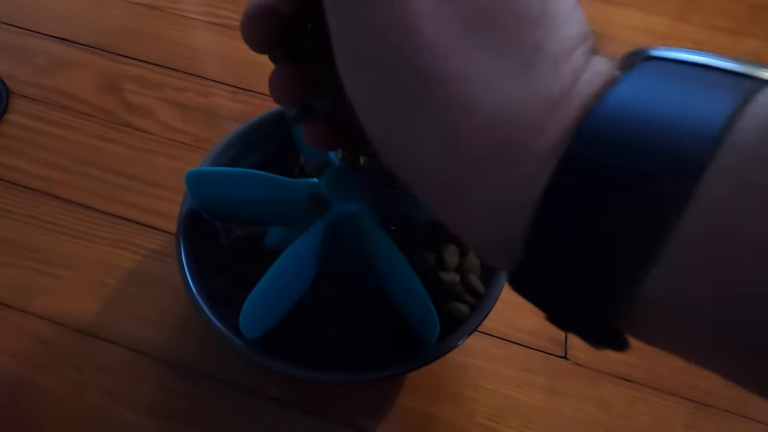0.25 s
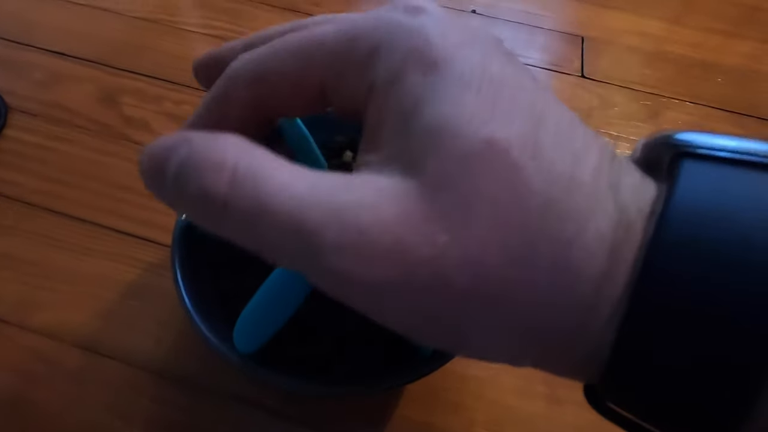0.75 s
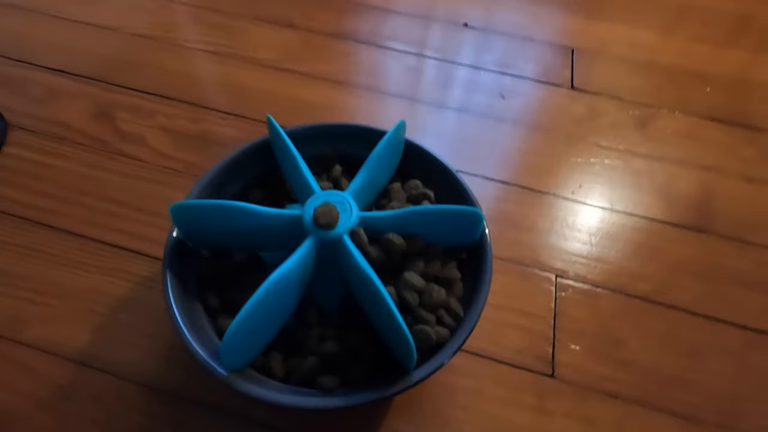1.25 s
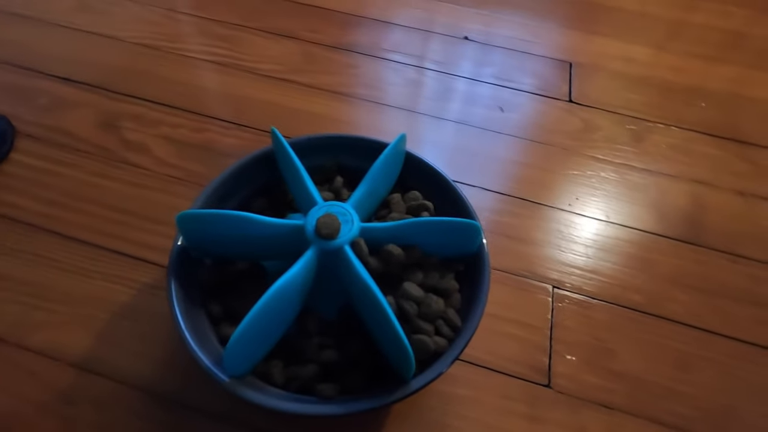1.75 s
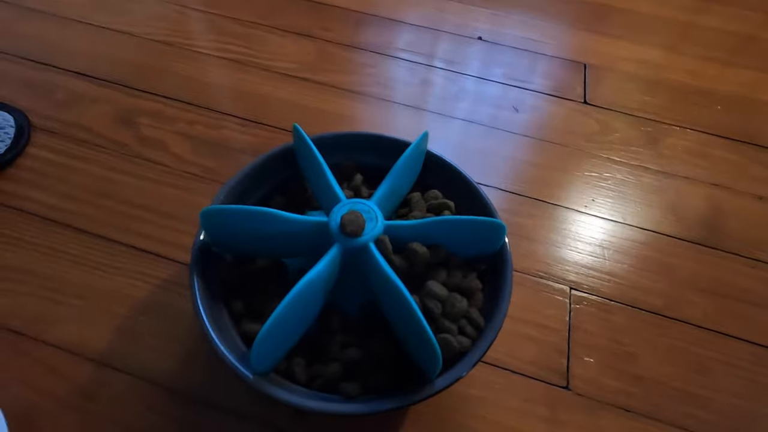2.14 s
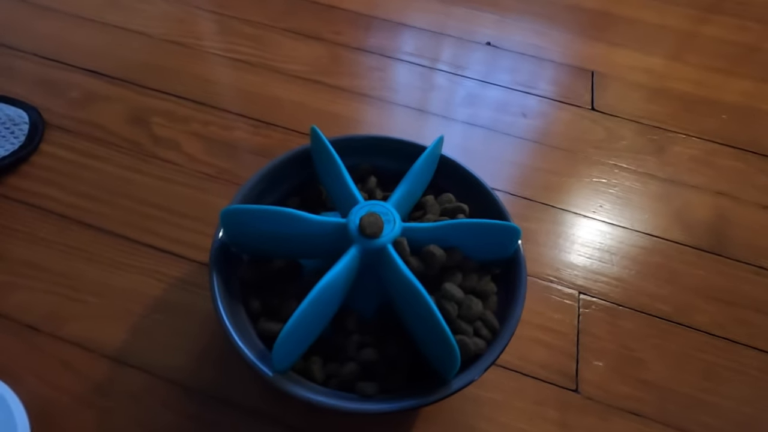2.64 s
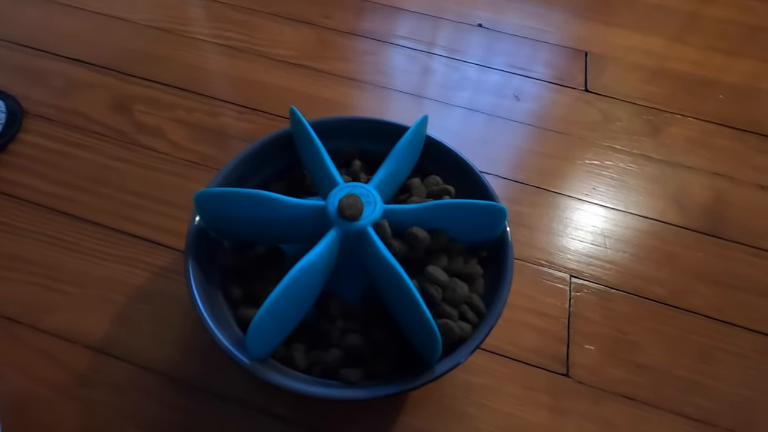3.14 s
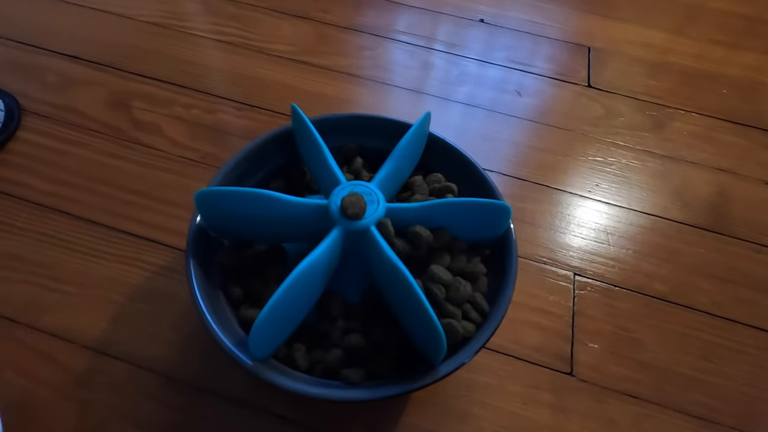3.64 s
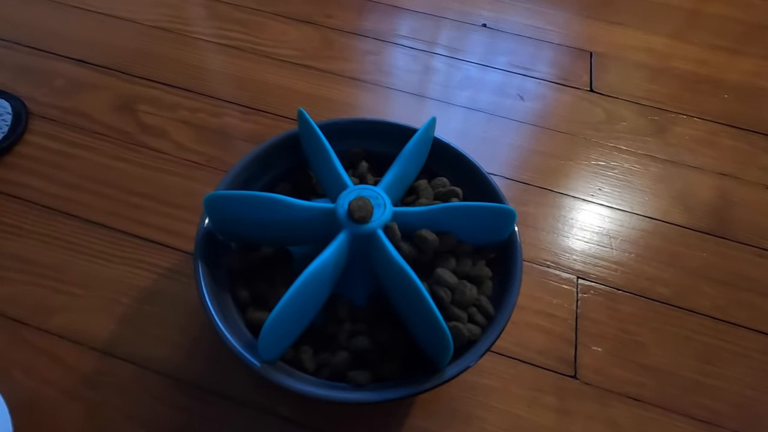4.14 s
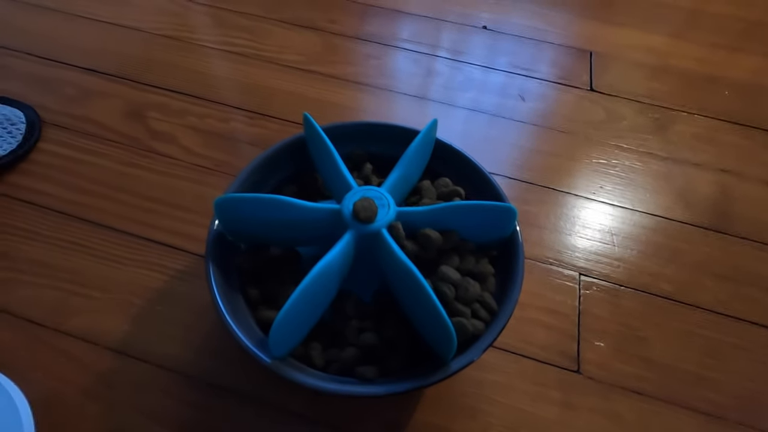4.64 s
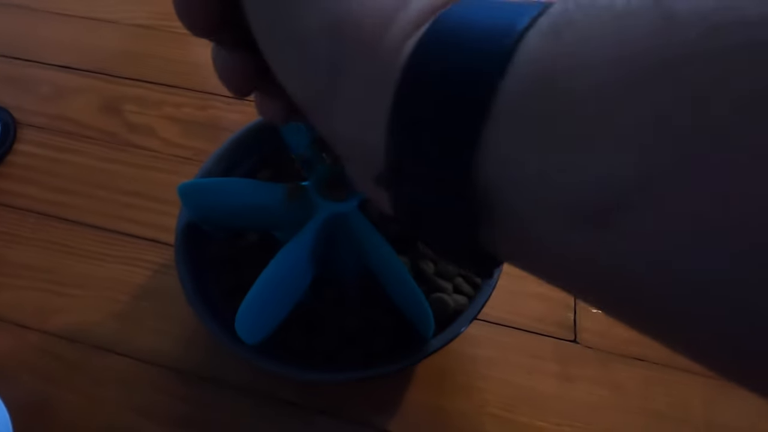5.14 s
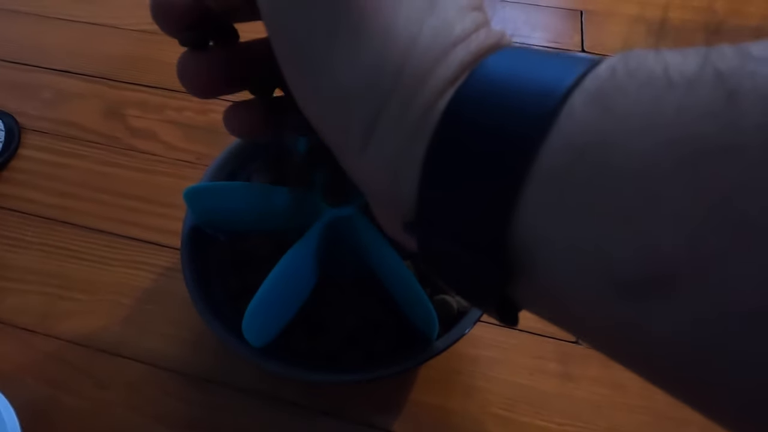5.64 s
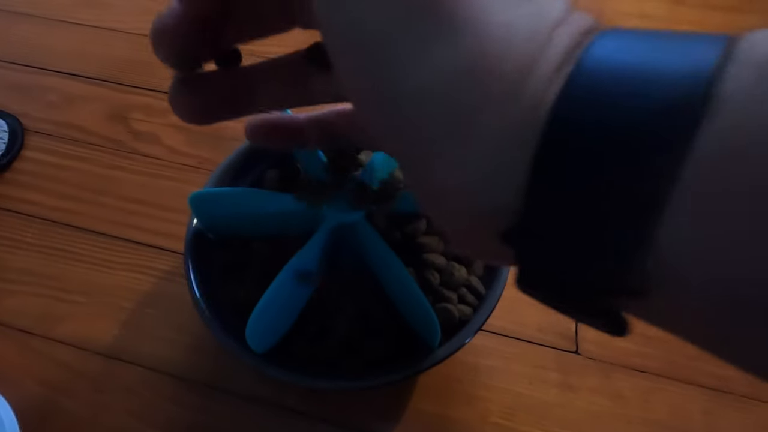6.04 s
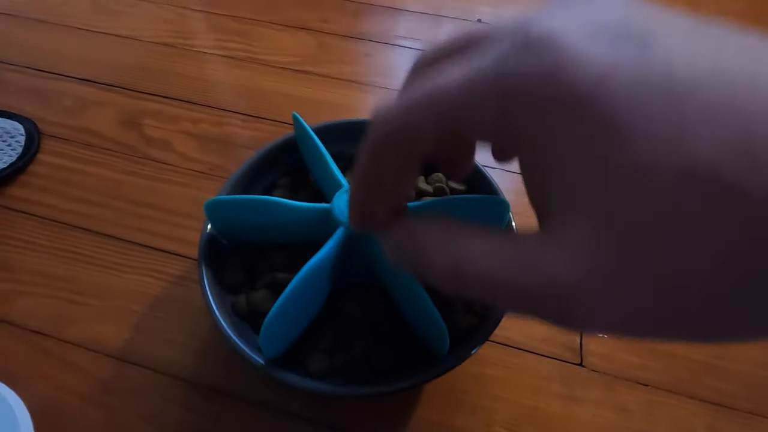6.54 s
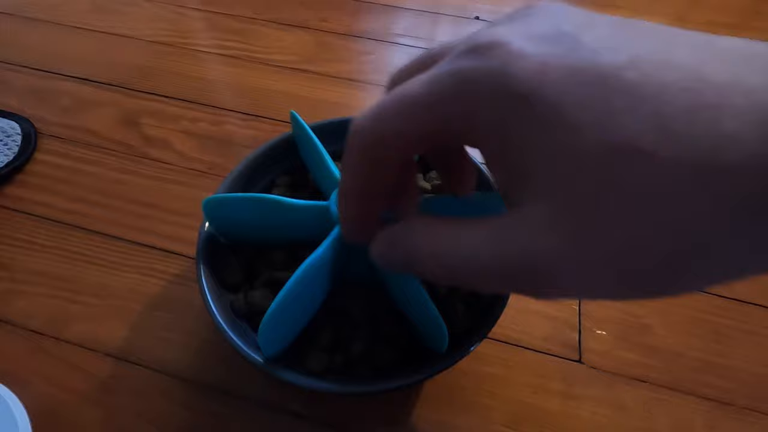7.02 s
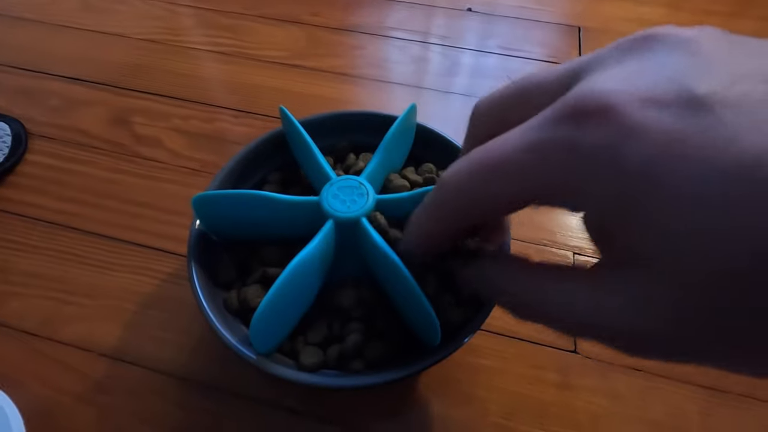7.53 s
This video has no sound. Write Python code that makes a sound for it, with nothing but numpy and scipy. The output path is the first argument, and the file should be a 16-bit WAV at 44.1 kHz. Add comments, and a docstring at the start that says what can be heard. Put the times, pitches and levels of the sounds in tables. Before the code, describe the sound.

Hard kibble patters and clinks into a bowl, pauses while a sleeve rustles, pours again, then fingers nudge a few last pieces indoors.

```python
"""Dry kibble poured into a glazed bowl

Two handfuls of kibble trickle from a hand into a glazed bowl with a plastic vaned insert, on a wooden floor.
Bowl, insert and pieces ring as banks of decaying modes; faint contacts are random trains of short grains.
Between handfuls cloth rustles as shaped noise and the hand-held microphone is bumped; at the end fingers
nudge a few strays in. Filtered noise and narrow wavering tones form a quiet room underneath."""
import sys
import numpy as np
from scipy import signal
from scipy.fft import rfft, irfft
from scipy.io import wavfile

SR = 44100
rng = np.random.default_rng(int(sys.argv[2]) if len(sys.argv) > 2 else 0)


def unload_wav(signal):
    """Save mono or channel-first audio to the path in sys.argv[1] as 16-bit WAV at rate SR, clipped to [-1, 1]."""
    wavfile.write(
        sys.argv[1],
        SR,
        np.round(np.clip(np.atleast_2d(signal).T, -1, 1) * 32767).astype(np.int16),
    )


N = 343098

# Pieces striking the bowl; hardness tilts the spectrum, the spot struck sets the two strongest mode groups
# [start_s, level_db, hardness_db_per_octave, modes_near_2500_hz_db, modes_near_4000_hz_db]
CLINKS = [(0.2095, -23.5, -9, -5.5, -9.5), (0.2225, -29, -8, 2.5, -3), (0.234, -19, 5, 5.5, 1),
          (0.2393, -26.5, 3, 2.5, 1), (0.2546, -25, -5.5, 2.5, 5.5), (0.2948, -18, -6.5, -0.5, -3),
          (0.3852, -27, -8.5, 3, 3.5), (0.397, -29.5, -6, 0, -12), (0.451, -37, -23, -5, 4.5),
          (0.4797, -32.5, -8, 3, -0.5), (0.512, -26, -2.5, -8.5, -16), (0.5313, -28.5, 3.5, 7.5, -12),
          (0.553, -28.5, -17.5, -2, -26), (0.562, -32.5, -14, 2, 1), (0.693, -28.5, -4, -1, -7),
          (0.7499, -23, -11, -1, -2), (0.8, -32, 6.5, 8, -1.5), (0.8258, -37.5, -13, -0.5, -3),
          (0.9248, -53, -6, 13, -6.5), (1.006, -45, -10, -4, -6), (1.059, -61.5, -13, 4, 1.5),
          (5.7919, -19, -10, 1.5, -3), (5.839, -36.5, -1.5, -2.5, -0.5), (5.858, -30.5, -9, 4.5, -5),
          (5.897, -45, 1, -0.5, -4), (5.908, -26.5, -7, -1, -6.5), (5.9481, -24.5, -1, 6, -5),
          (5.973, -42, -7, -0.5, -8), (6.001, -40.5, -3, -15, 1.5), (6.19, -33, -10, -5, -7.5),
          (6.2596, -28.5, -11, -7, -12), (6.3166, -41, -6.5, 3, -1.5), (6.3611, -17.5, 4, 0, -2.5),
          (6.379, -40.5, -7.5, 5, -4.5), (6.533, -48, -16, 7.5, -4.5), (6.582, -69.5, -3, 7, -3.5),
          (6.9548, -38, -9.5, -5.5, -5), (6.968, -58.5, -16, 1, -3), (7.007, -64.5, -6.5, 4, 0),
          (7.59, -48, -3, -7, -18), (7.625, -30, 0.5, -13, -7), (7.6955, -40, 7.5, -7, -4)]


def undb(db):
    """Amplitude gain is the exponential of a level: 20 dB is a factor of ten."""
    return 10 ** (np.asarray(db) / 20)


def unit(x):
    """Normalization by the root mean square gives a signal unit effective value."""
    return x / np.sqrt(np.mean(x ** 2))


def colour(x, points):
    """Minimum-phase filtering: folding the cepstrum of a (Hz, dB) spectrum gives a causal response."""
    hz, db = np.transpose(points)
    size = 8192
    f = np.maximum(np.fft.rfftfreq(size, 1 / SR), 1)
    log_magnitude = np.log(undb(np.interp(np.log(f), np.log(hz), db)))
    cepstrum = irfft(log_magnitude)[:size // 2]
    cepstrum[1:] *= 2
    response = irfft(np.exp(rfft(cepstrum, size)))[:size // 2]
    if x.ndim > 1:
        response = response[None]
    return signal.oaconvolve(x, response, axes=-1)[..., :N]


def walk(rate):
    """Slow fluctuation: random knots, `rate` per second, joined by lines with a spread near 1."""
    knots = rng.standard_normal(4096)
    return 1.2 * np.interp(np.arange(N) / SR * rate, np.arange(len(knots)), knots)


def add(track, s, sound):
    """Superposition: a sound adds linearly to a track from time s."""
    i = int(np.clip(s * SR, 0, N))
    track[..., i:i + sound.shape[-1]] += sound[..., :N - i]


def swell(s, rise, hold, fall, shape):
    """Envelope: full from s through hold, 20 dB down `rise` seconds before and `fall` seconds after."""
    t = np.arange(N) / SR - s
    away = np.clip(np.maximum(-t / rise, (t - hold) / fall), 0, 10)
    return undb(-20 * np.minimum(away ** shape, 10))


def ring(hz, gain, t60, length, rise=0.00016):
    """Modal synthesis: random-phase sines decay 60 dB in t60; the onset has time constant `rise`."""
    t = np.arange(int(length * SR)) / SR
    phase = rng.uniform(0, 2 * np.pi, (len(hz), 1))
    decay = np.exp(-np.log(1000) * np.outer(1 / t60, t))
    waves = np.sin(2 * np.pi * np.outer(hz, t) + phase) * decay
    return gain @ waves * (1 - np.exp(-t / rise))


def grain(hz, cycles, spread, count=7):
    """Strong damping: a small hard piece is a mode cluster around hz, dead in a few cycles; unit energy."""
    places = np.linspace(-1, 1, count) + .2 * rng.standard_normal(count)
    modes = np.minimum(hz * np.exp(spread * places), .42 * SR)
    weight = np.exp(-(np.log(modes / hz) / spread) ** 2)
    sound = ring(modes, weight, cycles / np.sqrt(modes * hz), length=.012, rise=.5 / hz)
    return sound / np.linalg.norm(sound)


def strikes(rows, cycles, spread):
    """Double impact: each (s, dB, Hz) row lands as a grain and soon rocks onto a second edge."""
    rock_s, rock_db = .0018, -5  # typical delay before random scaling; second edge relative to first
    out = np.zeros(N)
    for s, db, hz in rows:
        damping, shape, lag, edge = rng.uniform(.65, 1.35, 4)
        gain = undb(db) / np.hypot(1, undb(rock_db))
        add(out, s, gain * grain(hz, cycles * damping, spread * shape))
        second = grain(hz * edge, cycles * damping, spread)
        add(out, s + rock_s * lag ** 2, gain * undb(rock_db) * second)
    return out


def shower(rate, hz, cycles, scatter_db, count=12):
    """Shot noise: random contacts of `count` piece sizes, most faint and a few strong; rms 1."""
    times, sizes, pieces = rng.random((12000, 3))[:int(rate * N / SR)].T
    out = np.zeros(N)
    for k in range(count):
        own = (pieces * count).astype(int) == k
        pulses = np.zeros(N)
        pulses[(times[own] * N).astype(int)] = undb(-scatter_db * np.log(sizes[own] + 0.064))
        piece = grain(hz * np.exp(1.4 * (k / count - .5)), cycles, 0.89)
        out += signal.oaconvolve(pulses, piece)[:N]
    return unit(out)


def skids(rows, cycles, spread):
    """Stick-slip: a nearly even train of slips swells and fades, each slip ringing the same grain."""
    out = np.zeros(N)
    for s, length, db, hz, rate in rows:
        slip = grain(hz, cycles, spread)
        jitter = rng.standard_normal((40, 2))
        places = np.arange(.5, max(length * rate, 1))[:len(jitter)]
        arch = np.sqrt(np.sin(np.pi * places / (places[-1] + .5)))
        sizes = arch * undb(2 * jitter[:len(places), 0])
        sizes = sizes / np.linalg.norm(sizes)
        for place, size, late in zip(places, sizes, jitter[:, 1]):
            add(out, s + (place + .12 * late) / rate, undb(db) * size * slip)
    return out


def background():
    """Partly correlated noise fields: hiss with bass alike on both sides, over narrowband wavering tones."""
    # Spectrum of the quiet room before normalization [frequency_hz, relative_db]
    air_points = [(25, -4.5), (49, -10), (85, -10.5), (160, -5.5), (250, -16.5), (380, -23), (620, -38.5),
                  (950, -36), (2000, -43), (3300, -49.5), (5200, -62), (7300, -52.5), (9500, -67),
                  (16000, -77)]
    # Drone and whine of a distant appliance [frequency_hz, relative_db]
    hum_tones = [(96, -62.5), (144, -56.5), (350, -76), (894, -87), (1060, -85.5), (1950, -91)]
    air_db = -52.5
    mid, side = colour(rng.standard_normal((2, N)), air_points)
    side = colour(side, [(100, -23.0), (300, -12.0), (1000, -2.5), (5000, -4.0)])
    wavering = undb(.8 * walk(3))
    air = undb(air_db) * unit(mid + np.outer([1, -1], side)) * wavering
    t = np.arange(N) / SR
    drone = np.zeros(N)
    for hz, db in hum_tones:
        modulation = walk(28) + 1j * walk(28)  # random amplitude and phase broaden each tone
        drone += undb(db) * np.real(modulation * np.exp(2j * np.pi * hz * t))
    return (air + drone) * undb(np.array([[-.5], [.5]]))


def bumps():
    """Contact stiffness: soft blows on the microphone excite few high modes, and those decay first."""
    # Dull bumps of the hand holding the microphone; decay is that of a 350 Hz mode
    # [start_s, level_db, lowest_hz, brightness_hz, t60_at_350_hz_s]
    bump_rows = [(0.053, -32, 149.8, 330, 0.069), (0.13, -13.5, 186, 500, 0.041),
                 (0.163, -26, 218.3, 297, 0.22), (3.303, -22, 150, 254, 0.035),
                 (3.321, -16.5, 170, 230, 0.049), (3.4574, -18.5, 327, 1230, 0.055),
                 (3.7083, -23, 300, 610, 0.048), (5.0655, -21.5, 220, 1044, 0.069),
                 (5.082, -21.5, 198, 386, 0.062), (5.1071, -18.5, 217, 890, 0.037),
                 (5.151, -27, 150, 220, 0.081)]
    # Modes of the microphone casing [frequency_hz, relative_db]
    casing_modes = [(150, -16.5), (220, -13), (275, -4.5), (345, -3), (425, -5), (555, -10), (690, -9),
                    (820, -12.5), (920, -10), (1090, -8.5), (1240, -6.5), (1480, -14)]
    scuff_db, scuff_t60_s = -17.5, 0.1  # skin drags briefly on the casing; level relative to the bump
    sway_s, sway_db = 0.12, -40  # the microphone sways as the hand first opens
    hz, db = np.transpose(casing_modes)
    out, t = np.zeros(N), np.arange(SR // 4) / SR
    for s, level_db, low_hz, bright_hz, t60 in bump_rows:
        gain = undb(db + level_db) / np.hypot(1, (hz / bright_hz) ** 3)
        gain = gain / np.hypot(1, (low_hz / hz) ** 4)
        add(out, s, ring(hz, gain, t60 * (350 / hz) ** .55, length=.2, rise=.0015))
        band = signal.butter(2, [low_hz, low_hz + bright_hz / 2], "bandpass", fs=SR, output="sos")
        scuff = unit(signal.sosfilt(band, rng.standard_normal(len(t))))
        add(out, s, scuff * undb(level_db + scuff_db - 60 * t / scuff_t60_s))
    out = colour(out, [(1500, 0), (2500, -9), (5000, -24)])
    rumble = colour(rng.standard_normal(N), [(15, -9.0), (28, 8.5), (50, -3.5), (100, -24.0),
                                             (300, -11.0), (450, -21.0), (1000, -55.0)])
    return out + unit(rumble) * undb(sway_db) * swell(sway_s, rise=.25, hold=.04, fall=.16, shape=1)


def room(x, wet_db, t60_s, early_db):
    """Reverberation: floor and hand reflect early, walls add a short tail whose treble decays sooner."""
    t = np.arange(SR // 2) / SR
    early = rng.standard_normal((3, len(t))) * undb(-60 * t / 0.051) * (t > .002)
    noise = rng.standard_normal((3, len(t)))
    low = signal.sosfilt(signal.butter(2, 1800, fs=SR, output="sos"), noise)
    tail = low * undb(-60 * t / t60_s) + (noise - low) * undb(-60 * t / (.65 * t60_s))
    tail = tail * (t > .008)
    early = undb(early_db) * early / np.linalg.norm(early[0])
    tail = undb(wet_db) * tail / np.linalg.norm(tail[0])
    both, left, right = early + tail
    response = 1.6 * both + 2.2 * np.array([left, right])  # shared part correlates the two sides
    wet = signal.oaconvolve(x[None], response, axes=1)[:, :N]
    return colour(wet, [(200, -0.5), (600, 1.5), (2500, 1.5), (7000, -0.5), (12000, 4.5)])


def shakes(rows):
    """Modal participation: each landing meets another spot and excites its own mix of modes below it."""
    # Modes of the insert, and of the bowl pressed through it [frequency_hz, relative_db, t60_s]
    shaken_modes = [(540, -13, 0.014), (660, -13, .014), (1120, -3.5, .014), (1270, -0.5, 0.015),
                    (1600, 0, 0.01), (2574, -8, .026), (2772, -12.5, .02), (3984, -11.5, 0.052)]
    shake_db, scatter_db = -15, 5  # level relative to the landing; spread from spot to spot
    hz, db, t60 = np.transpose(shaken_modes)
    out = np.zeros(N)
    for s, level_db, _ in rows:
        spot, load = rng.standard_normal((2, len(hz)))
        detune = 1 + load * np.where(hz < 2000, .085, .005)
        sound = ring(hz * detune, undb(db + scatter_db * spot), t60, length=.04, rise=.0003)
        add(out, s, undb(level_db + shake_db) * sound / np.linalg.norm(sound))
    return out


def kibble():
    """Impact and friction: pieces tick, skid and knock on the insert, and each listed landing shakes it."""
    # The hand opens, lets pieces run and empties [full_flow_s, rise_s, hold_s, fall_s, flow_db]
    pour_rows = [(0.268, 0.35, 0.2, 0.4, 2), (5.779, 0.69, 0.085, 0.65, -5.5)]
    # Sharpest landings on other pieces, before spectral shaping [start_s, level_db, pitch_hz]
    tick_rows = [(0.0449, -20.5, 6600), (0.0675, -22.5, 6200), (0.0806, -32, 5700), (0.0858, -19, 5700),
                 (0.1015, -50, 6500), (0.1149, -12.5, 5260), (0.1466, -12.5, 4700), (0.1748, -14.5, 3900),
                 (0.1909, -16, 6300), (0.2052, -18, 5500), (0.2105, -14, 6200), (0.2735, -21, 6500),
                 (0.2872, -14, 5640), (0.3107, -5, 5300), (0.3298, -21, 4100), (0.3605, -17, 5300),
                 (0.3744, -17, 4370), (0.396, -21, 7000), (0.4209, -18, 4800), (0.4253, -20, 5200),
                 (0.4402, -28, 4470), (0.5034, -14, 4200), (0.546, -15, 4630), (0.5923, -16, 6700),
                 (0.6107, -18, 6130), (0.6256, -17, 6350), (0.6351, -12.5, 7500), (0.6588, -17, 6200),
                 (0.6659, -17, 7100), (0.6861, -36, 4900), (0.6901, -10, 6400), (0.7012, -8, 7060),
                 (0.7211, -33, 5800), (0.7345, -25, 6400), (0.739, -15, 6350), (0.8491, -12.5, 5360),
                 (0.8619, -23, 7550), (0.9245, -18, 8550), (0.934, -39, 7000), (0.952, -41, 6800),
                 (0.9681, -27, 5770), (1.0329, -27.5, 7280), (1.081, -38.5, 6640), (5.2083, -24.5, 6380),
                 (5.2173, -27, 6000), (5.2401, -25, 6200), (5.2858, -21.5, 7100), (5.3043, -17.5, 6200),
                 (5.316, -36, 5370), (5.3211, -11.5, 6650), (5.3713, -17, 5400), (5.3813, -15, 6200),
                 (5.3942, -19, 5700), (5.4085, -29, 6400), (5.4238, -21.5, 7540), (5.4679, -24, 7600),
                 (5.4756, -22, 7200), (5.5111, -19, 6300), (5.5161, -13, 6600), (5.5366, -18, 6500),
                 (5.5648, -11.5, 6900), (5.5845, -10, 6050), (5.5958, -9.5, 7200), (5.6069, -14, 7000),
                 (5.6278, -18, 7100), (5.6826, -12.5, 7200), (5.6934, -12.5, 6000), (5.7417, -20, 5540),
                 (5.7457, -12, 7100), (5.7691, -7, 5300), (5.7751, -31, 5400), (5.822, -13, 3950),
                 (5.8392, -12.5, 4930), (5.8456, -14, 6100), (5.8583, -10.5, 4030), (5.8665, -8, 5840),
                 (5.878, -4, 6150), (5.8872, -21, 5800), (5.8963, -10, 5600), (5.912, -4.5, 6360),
                 (5.9743, -10.5, 6900), (5.9944, -13.5, 4720), (6.0077, -19, 5600), (6.0233, -15, 5400),
                 (6.0289, -24, 5800), (6.0416, -11, 5900), (6.0476, -24, 5400), (6.054, -12.5, 5940),
                 (6.0856, -10, 6660), (6.089, -25, 5300), (6.1248, -13.5, 7700), (6.1526, -16, 6800),
                 (6.1616, -32, 6200), (6.1714, -13, 4700), (6.205, -22, 4400), (6.215, -19.5, 5800),
                 (6.2779, -10.5, 6540), (6.308, -18, 5700), (6.3529, -21, 5160), (6.4311, -23, 5700),
                 (6.4937, -15, 6200), (6.497, -23, 5200), (6.886, -35.5, 4430), (6.9253, -23.5, 6260),
                 (6.939, -31, 6480), (7.215, -36, 6400), (7.5207, -22.5, 4000), (7.5487, -26.5, 5370),
                 (7.7157, -21.5, 6000), (7.7382, -19, 4600)]
    # Heaviest landings on the plastic insert, before spectral shaping [start_s, level_db, pitch_hz]
    knock_rows = [(0.0409, -13.5, 1566), (0.045, -16, 1498), (0.068, -21.5, 2200), (0.0851, -14.5, 1610),
                  (0.1005, -13.5, 1480), (0.118, -18.5, 2198), (0.141, -16, 1700), (0.149, -16, 1500),
                  (0.1657, -9.5, 1870), (0.176, -16.5, 1700), (0.27, -11.5, 1920), (0.306, -9, 1675),
                  (0.328, -21, 1973), (0.354, -17.5, 1500), (0.382, -26, 1280), (0.4077, -14, 1580),
                  (0.424, -11, 1570), (0.4461, -9.5, 1440), (0.5403, -17, 2120), (0.547, -17, 1340),
                  (0.6406, -11.5, 1680), (0.6716, -13, 2070), (0.7, -10.5, 1630), (0.7175, -5.5, 1590),
                  (0.7346, -14, 1610), (0.7595, -11, 1538), (0.84, -28, 1600), (0.857, -19, 1600),
                  (0.8613, -22.5, 1360), (0.905, -36, 1700), (0.9241, -16, 1360), (0.933, -27, 1350),
                  (0.951, -30, 1690), (0.9693, -21.5, 1600), (0.988, -25, 1600), (1.007, -20, 1580),
                  (1.042, -24.5, 1367), (5.2018, -14.5, 1530), (5.222, -17, 1470), (5.2402, -16, 1520),
                  (5.3151, -8.5, 1940), (5.328, -17, 1530), (5.3707, -17, 1960), (5.38, -7.5, 1770),
                  (5.3947, -17.5, 2040), (5.417, -19, 1610), (5.435, -16.5, 1570), (5.4867, -14.5, 1330),
                  (5.532, -16.5, 1820), (5.57, -28, 1496), (5.5847, -16, 2360), (5.596, -9, 1840),
                  (5.607, -21.5, 1600), (5.6273, -24, 1800), (5.6688, -8, 1410), (5.688, -7, 1392),
                  (5.6993, -15, 1518), (5.7253, -18.5, 1583), (5.7326, -7.5, 1270), (5.746, -23.5, 1600),
                  (5.7611, -10, 1680), (5.7682, -16, 2324), (5.8021, -10, 1500), (5.832, -5.5, 1580),
                  (5.8562, -19, 2500), (5.868, -25, 2180), (5.882, -6.5, 1600), (5.9778, -16.5, 1490),
                  (5.9902, -10, 1670), (6.0008, -9.5, 1930), (6.0236, -20.5, 1480), (6.0432, -15.5, 1390),
                  (6.0746, -20.5, 1390), (6.0953, -19.5, 1600), (6.1152, -15.5, 1517),
                  (6.1602, -13.5, 1475), (6.17, -24.5, 1680), (6.1956, -11.5, 1530), (6.2797, -12.5, 2240),
                  (6.3375, -12, 1695), (6.41, -17.5, 1290), (6.431, -19.5, 1750), (6.496, -28, 1540),
                  (6.5353, -34.5, 1740), (6.9555, -21, 1770)]
    # Pieces catching and slipping over neighbours [start_s, length_s, level_db, pitch_hz, slips_per_s]
    skid_rows = [(0.3625, 0.0094, -21, 5200, 900), (0.3795, .005, -13, 4300, 700),
                 (0.6845, 0.0098, -15, 3600, 1040), (0.739, 0.007, -17, 4000, 510),
                 (5.2385, 0.0051, -14, 2300, 700), (5.4745, 0.0056, -14.5, 4100, 880),
                 (5.553, 0.0033, -16, 5800, 650), (5.676, 0.015, -14, 5600, 600),
                 (5.7215, .007, -12.5, 4700, 800), (5.7725, 0.0081, -15, 5200, 750),
                 (5.889, .006, -16, 4900, 750)]
    crackle_db, patter_db = -46, -49  # small contacts among pieces and on the insert, at 0 dB flow
    patter_law = .75  # exponent under 1: a thin stream still reaches the insert
    clink_tick_db, tick_hz = 0, 6200  # a piece hitting the bowl also ticks itself
    cushion_db = -7  # a tick shakes the insert less than a knock

    flow = sum(undb(db) * swell(s, rise, hold, fall, shape=2.0) for s, rise, hold, fall, db in pour_rows)
    crackle = undb(crackle_db) * flow * shower(rate=260, hz=5600, cycles=13, scatter_db=6.3)
    patter = undb(patter_db) * flow ** patter_law * shower(rate=210, hz=1850, cycles=8, scatter_db=5.8)
    on_bowl = [(s, db + clink_tick_db, tick_hz) for s, db, *_ in CLINKS]
    ticks = crackle + strikes(tick_rows + on_bowl, cycles=11, spread=.7)
    ticks = ticks + skids(skid_rows, cycles=8, spread=.8)
    knocks = patter + strikes(knock_rows, cycles=8, spread=.6)
    ticks = colour(ticks, [(500, 3.5), (3000, -1.5), (5000, -1), (7600, 4), (9500, -6.0),
                           (12000, -9), (14000, -16.0), (16000, -28.0)])
    contacts = ticks + colour(knocks, [(2300, -1), (3100, -6), (5000, -8), (9000, -17)])
    shaken = contacts + shakes(knock_rows) + undb(cushion_db) * shakes(tick_rows)
    # the hollow of the bowl lifts 550 Hz and 1.2 kHz and swallows the band between
    return colour(shaken, [(150, 0.0), (380, 6), (550, 8.5), (720, -2), (920, -16.5),
                           (1200, 1.0), (1700, -4), (2600, -1.0), (3200, -3), (5000, -3.5)])


def bowl_clinks():
    """Modal excitation: a blow's hardness and place weight the bowl's modes; pieces in it rattle briefly."""
    # Modes of the bowl when empty [frequency_hz, relative_db, empty_t60_s]
    bowl_modes = [(560, -23, .035), (1120, -12.5, .03), (1225, -14, .06), (2487, -6, .04), (2560, -11, .04),
                  (2680, -16, .04), (2811, -21, .04), (3419, -17.5, .09), (3730, -19, .04),
                  (4020, -15, .03), (4166, 1.5, .063), (4300, -14, .025), (5916, -14, .11),
                  (6160, -14, .06), (6216, -2, .052), (7908, -27, .05), (8608, -13.5, .07),
                  (8943, -12.5, .085), (9952, -24, .04), (10307, -34, .08), (11030, -32, .04),
                  (11321, -28, .07), (12680, -32, .07), (14020, -41, .05), (15050, -45, .08)]
    ring_share = 0.87  # share of the ring time left with food in the bowl
    load_detune, spot_scatter_db = .002, 1.5  # relative detuning by shifting food; spread between spots
    hz, db, t60 = np.transpose(bowl_modes)
    octaves = np.log2(np.clip(hz, 3000, 8600) / 4166)
    low_group = np.interp(hz, [1300, 2400, 2850, 3400], [0, 1, 1, 0])
    main_group = np.interp(hz, [3400, 3900, 4400, 5900], [0, 1, 1, 0])
    out, rattle, t = np.zeros((2, N)), np.zeros(N), np.arange(SR // 8) / SR
    for s, level_db, hardness_db, low_db, main_db in CLINKS:
        spot, load = rng.standard_normal((2, len(hz)))
        place_db = low_db * low_group + main_db * main_group + spot_scatter_db * spot
        gain = undb(level_db + db + hardness_db * octaves + place_db)
        # high modes radiate in narrow lobes, so they reach the two sides unequally
        lobes_db = (hz / 10000) ** 2 * (3.5 + 2 * rng.standard_normal(len(hz)))
        sides = gain * undb(np.outer([.5, -.5], lobes_db))
        add(out, s, ring(hz * (1 + load_detune * load), sides, t60 * ring_share, length=.15, rise=.00017))
        add(rattle, s, np.linalg.norm(gain) * undb(-60 * t / 0.05))
    buzz = colour(rng.standard_normal(N), [(150, -13.0), (350, 8.0), (560, 2.5), (880, -9.0),
                                           (1200, 0.5), (2000, -2.0), (2700, -16.0), (3300, -11.0),
                                           (4500, -7.5), (7800, -7.0), (10000, -12.5), (14000, -36.5)])
    return out + undb(-18.5) * rattle * unit(buzz)


def cloth():
    """Friction noise: fibres slip and snag, brighter in some strokes; folds flap, creases snap, ribs rasp."""
    # Spectrum of the fibre scrape before normalization [frequency_hz, relative_db]
    scrape_points = [(300, -5), (450, -7), (700, -3.5), (950, 2), (1300, 4.5), (2000, -2), (2800, -1.5),
                     (4000, -3), (6000, -15), (7000, -11), (9000, -35.5), (15000, -60.5)]
    # Spectrum of the airy hiss before normalization [frequency_hz, relative_db]
    sheen_points = [(2000, -10.5), (5200, -1.5), (7400, 8.5), (9500, -7.5), (12000, -5.5), (14000, -14.5),
                    (16000, -25)]
    # Spectrum of flapping folds before normalization [frequency_hz, relative_db]
    flap_points = [(90, -14.5), (170, 5.5), (260, 4), (420, 2.5), (600, -13), (1000, -50.5)]
    # Creases snapping, before the fabric damps their treble [start_s, level_db, pitch_hz]
    crease_rows = [(3.134, -41, 2330), (3.258, -36, 2420), (3.471, -24, 2004), (3.554, -44, 2800),
                   (3.65, -21, 4030), (3.679, -26, 3260), (3.687, -7, 4730), (3.692, -19, 2300),
                   (3.707, -12, 1600), (3.721, -17, 2660), (3.748, -27, 3800), (3.793, -27, 3170),
                   (3.812, -30, 3600), (3.928, -29, 3200), (3.993, -22, 2500), (4.023, -23.5, 1910)]
    # Ribbed cloth rasping over itself, before that damping
    # [start_s, length_s, level_db, pitch_hz, ribs_per_s]
    rasp_rows = [(3.106, 0.038, -24.5, 1600, 480), (3.242, 0.016, -26, 1920, 400),
                 (3.281, 0.017, -33, 5800, 450), (3.612, 0.035, -17.5, 2000, 350)]
    # Strokes as the arm moves [peak_s, rise_s, fall_s, friction_db, brightness_hz, flap_db, hiss_db]
    stroke_rows = [(1.361, 0.22, 0.11, -70, 2534, -74.5, -70.5), (1.95, .12, 0.13, -82, 2490, -75, -82),
                   (3.07, 0.033, 0.094, -57, 2220, -48, -67), (3.128, 0.035, 0.059, -47, 2600, -58, -82),
                   (3.29, 0.22, 0.083, -49, 2310, -42, -69.5), (3.479, 0.28, 0.24, -52.5, 1030, -46, -76),
                   (3.686, 0.096, 0.088, -35.5, 8000, -33.5, -77.5),
                   (3.89, 0.23, 0.18, -52, 2480, -53, -74), (4.191, 0.7, 0.23, -66, 2420, -64, -74.5),
                   (5.024, 0.01, 0.38, -65.5, 2500, -65.5, -78),
                   (6.688, 0.014, 0.016, -69.5, 5000, -69, -79), (6.766, .02, .05, -71, 4000, -60, -79.5),
                   (7.215, 0.02, 0.012, -61, 3960, -67, -73)]
    stroke_shape = 1.26  # 1 is a pointed swell, 2 a rounded one
    snag_db = -2  # snagging fibres against the smooth scrape

    fibres = rng.standard_normal(N) * undb(2.5 * walk(350) + 1.9 * walk(45))
    scrape = unit(colour(fibres, scrape_points))
    sheen = unit(colour(fibres, sheen_points))
    snags = unit(colour(shower(rate=380, hz=2400, cycles=3, scatter_db=5.5, count=4), scrape_points))
    scrape = unit(scrape + undb(snag_db) * snags)
    flap = unit(colour(rng.standard_normal(N), flap_points))
    snaps = strikes(crease_rows, cycles=9, spread=.7) + skids(rasp_rows, cycles=5, spread=.7)
    # soft fabric swallows the top of every snap
    out = colour(snaps, [(3000, 0), (6500, -3), (9000, -16), (14000, -24)])
    for s, rise, fall, friction_db, bright_hz, flap_db, hiss_db in stroke_rows:
        rub = signal.sosfilt(signal.butter(2, bright_hz, fs=SR, output="sos"), scrape)
        layers = undb(friction_db) * rub + undb(flap_db) * flap + undb(hiss_db) * sheen
        out += swell(s, rise, 0, fall, stroke_shape) * layers
    return out


def nudges():
    """Granular friction and modal ringing: fingertips scrape food and the insert slips against the bowl."""
    # Fingers push the insert against the bowl wall; hardness tilts modes above 1100 Hz
    # [start_s, level_db, hardness_db_per_octave]
    nudge_rows = [(7.507, -51.5, 0), (7.521, -46, -4.5), (7.552, -43, -6.5), (7.588, -42.5, -4),
                  (7.6263, -43.5, 3), (7.635, -57, 9), (7.6949, -48.5, 3), (7.745, -42.5, -5)]
    # Modes of insert and bowl under the fingers [frequency_hz, relative_db, t60_s]
    pressed_modes = [(337, -1, 0.14), (590, 1.5, 0.018), (1100, -0.5, 0.06), (1190, -0.5, 0.067),
                     (2040, -2, 0.023), (2480, 1.5, 0.029), (3420, -7, 0.086)]
    stir_s, stir_length_s, stir_db = 7.51, 0.2, -61
    hz, db, t60 = np.transpose(pressed_modes)
    grit = shower(rate=900, hz=3200, cycles=12, scatter_db=4)
    out = undb(stir_db) * grit * swell(stir_s, rise=0.018, hold=stir_length_s, fall=0.054, shape=4.1)
    octaves = np.log2(np.maximum(hz / 1100, 1))
    for s, level_db, hardness_db in nudge_rows:
        gain = undb(db + level_db + hardness_db * octaves)
        add(out, s, ring(hz, gain, t60, length=.12, rise=0.00019))
    return out


def scene():
    """Superposition of direct and reflected sound: bowl in front, cloth and bumps close by, in one room."""
    pan_db = -2  # where the bowl lies for the microphone: left minus right
    food = bowl_clinks() + kibble() + nudges()
    thuds, sleeve = bumps(), cloth()
    direct = food * undb(pan_db * np.array([[.5], [-.5]]))
    near = thuds * undb(np.array([[-.5], [.5]])) + sleeve * undb(np.array([[1.2], [-1.2]]))
    echoes = room(food.mean(axis=0), wet_db=-21, t60_s=.26, early_db=-22)
    echoes += room(thuds + sleeve, wet_db=-20, t60_s=.26, early_db=-19)
    return direct + near + echoes + background()


def record(dry):
    """Band limitation: a steep elliptic low-pass filter removes the top above 16 kHz."""
    return signal.sosfilt(signal.ellip(8, .2, 70, 16000, fs=SR, output="sos"), dry)


dry = scene()
out = record(dry)
unload_wav(out)
```